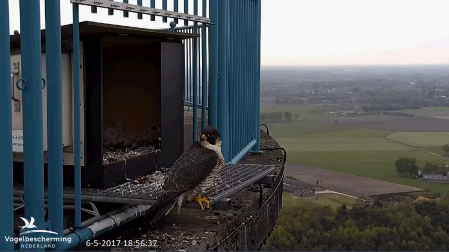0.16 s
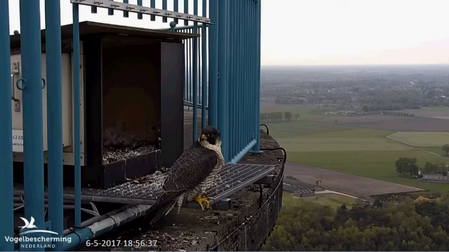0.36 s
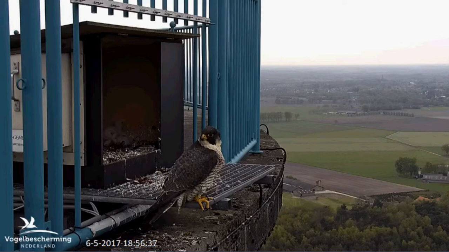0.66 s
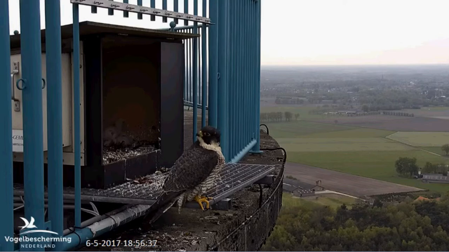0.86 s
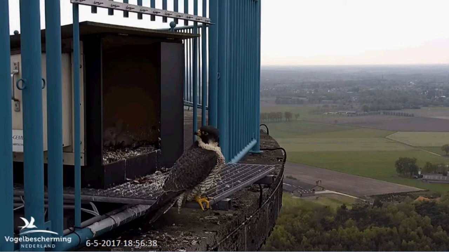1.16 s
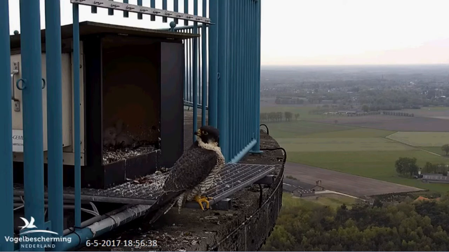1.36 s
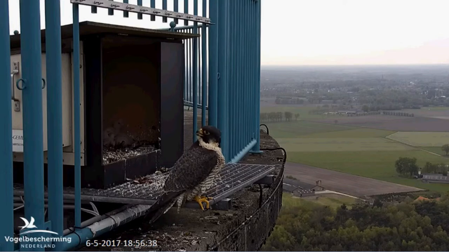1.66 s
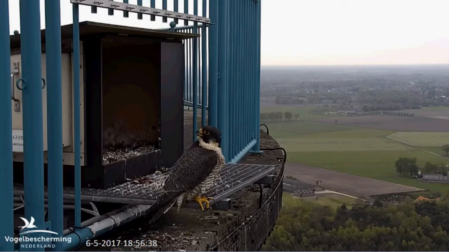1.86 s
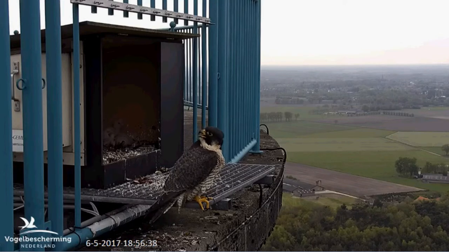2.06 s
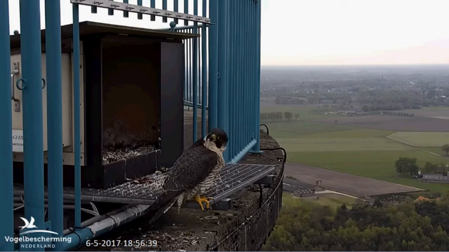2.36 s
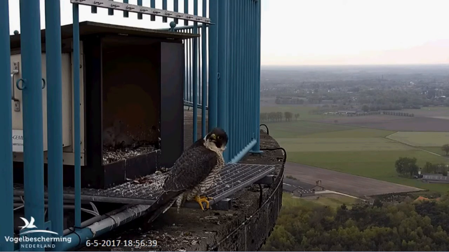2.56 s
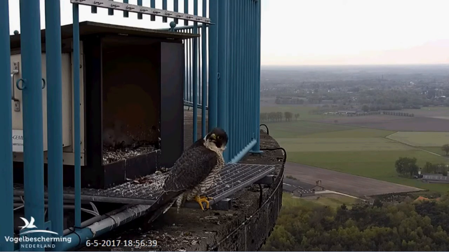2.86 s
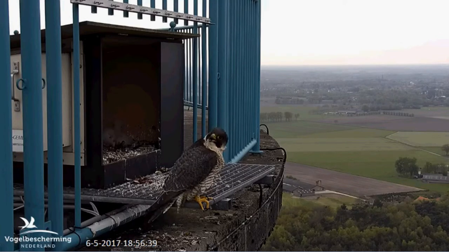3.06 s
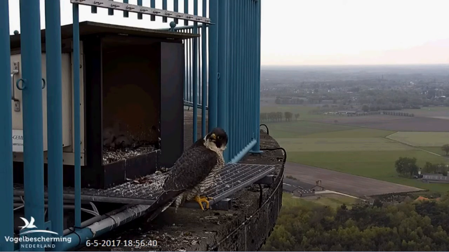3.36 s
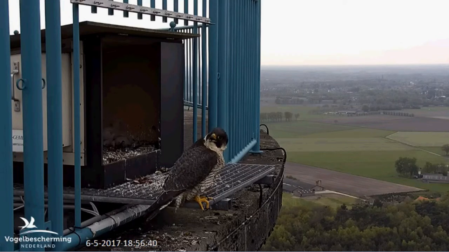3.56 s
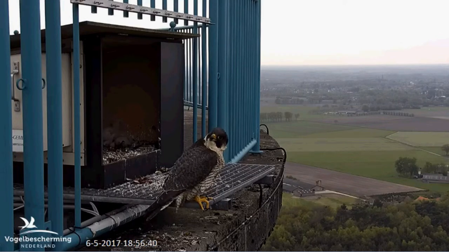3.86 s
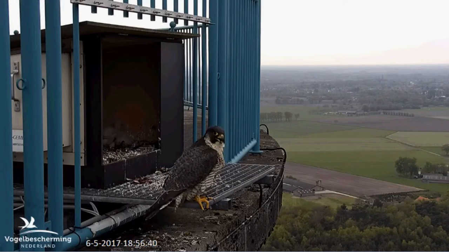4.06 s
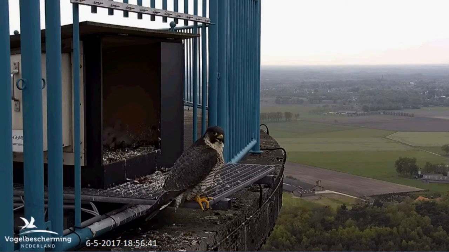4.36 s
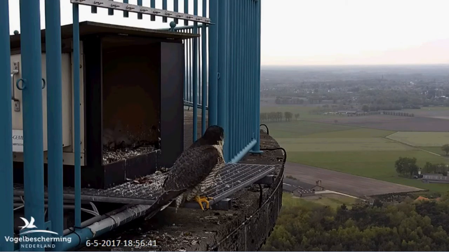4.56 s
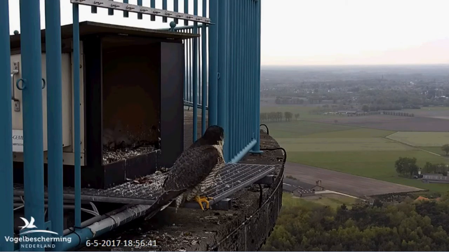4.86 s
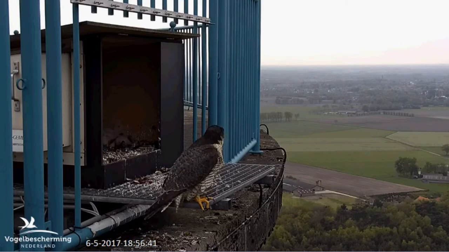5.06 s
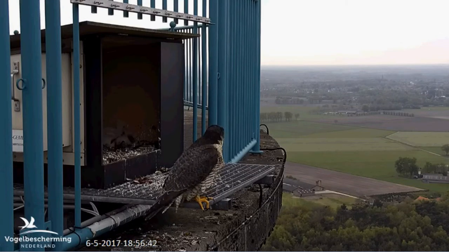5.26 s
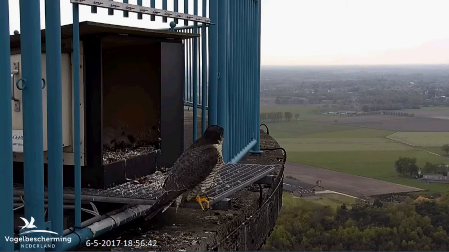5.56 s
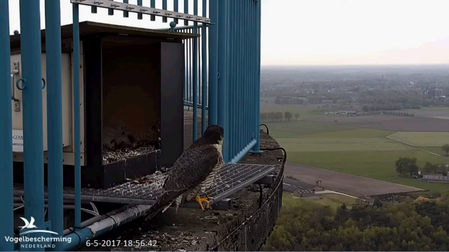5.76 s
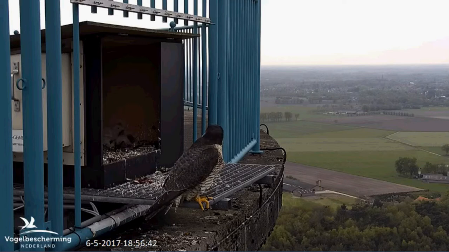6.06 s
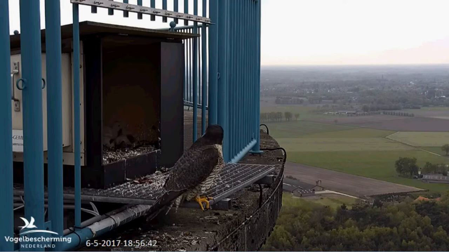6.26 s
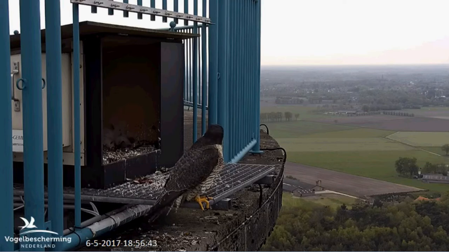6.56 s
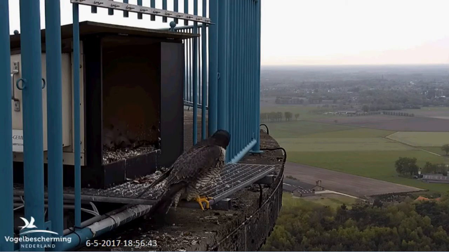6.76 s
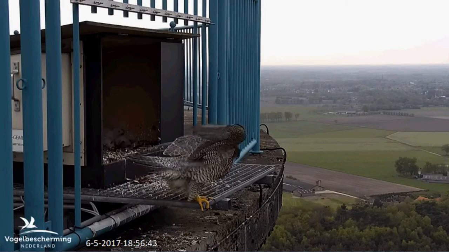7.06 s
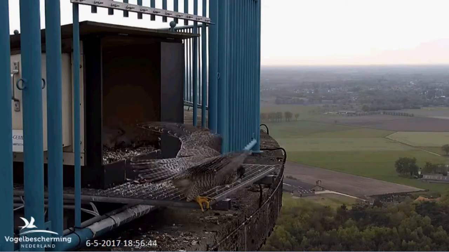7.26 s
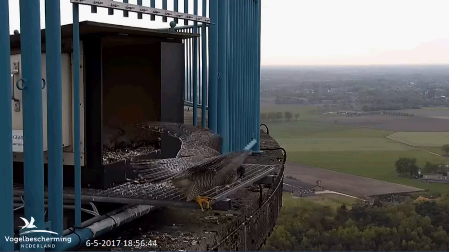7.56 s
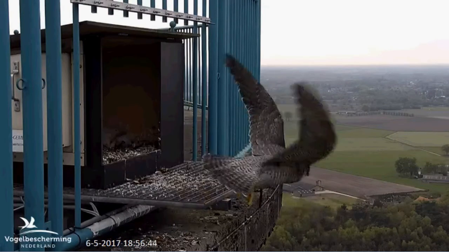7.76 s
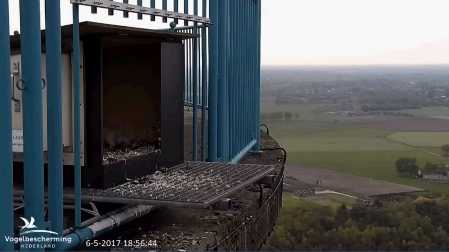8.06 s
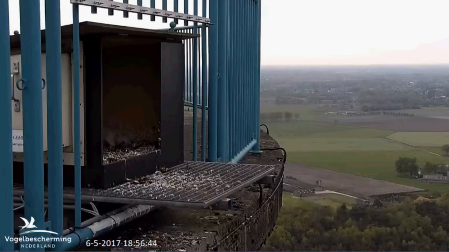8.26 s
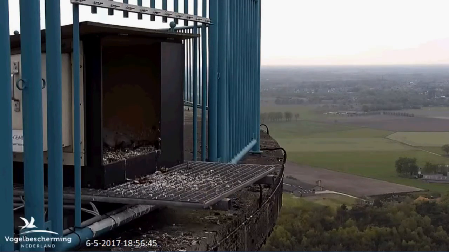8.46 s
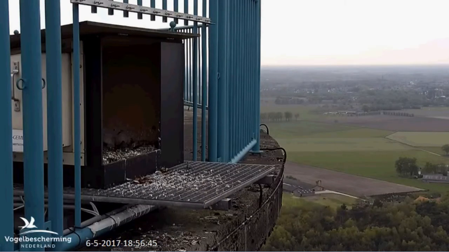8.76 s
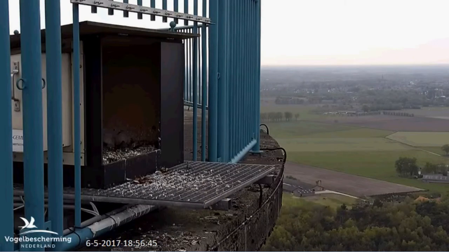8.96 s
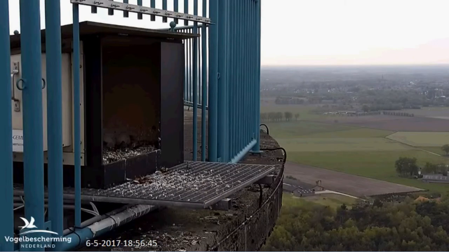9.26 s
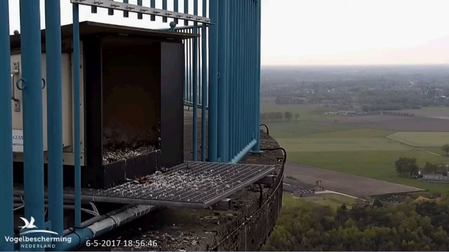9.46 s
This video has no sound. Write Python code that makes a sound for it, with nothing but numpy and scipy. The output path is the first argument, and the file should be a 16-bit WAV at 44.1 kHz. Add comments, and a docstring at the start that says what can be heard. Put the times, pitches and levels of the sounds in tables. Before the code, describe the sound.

High on a windy tower, a large falcon gives a regular run of strained, nasal, whining calls, about one a second, each gliding up in pitch. Gusts blow a soft hollow moan near the microphone, with faint mains buzz beneath. A poor connection chops the sound with crackles, skips and very short mutes. The calling stops, leaving wind and a few light scratchy ticks; no wingbeats stand out.

```python
"""Falcon wailing over a poor camera link

A falcon wails seven times on a tower ledge, close to a fixed outdoor camera: gliding harmonics plus a mouth resonance.
Wind moans in a hollow near the microphone, as noise through resonances over a broad rush. Under it lie a faint
mains hum and buzz, and a few small dry ticks of noise. The camera sends its sound in 10 ms packets over a poor
link: the waveform skips with a click at many seams, and late packets leave short mutes."""
import sys
import numpy as np
from scipy import signal
from scipy.io import wavfile
from scipy.ndimage import uniform_filter1d

SR = 44100
rng = np.random.default_rng(int(sys.argv[2]) if len(sys.argv) > 2 else 0)


def transcribe(u):
    """Save the signal u as a 16-bit wav file named by the first command-line argument.

    u: samples, shape (n,) or (channels, n), limited to [-1, 1]; the rate is SR.
    q: integer samples, one column per channel.
    """
    v = np.clip(np.atleast_2d(u).T, -1, 1)
    q = np.round(v * 32767).astype(np.int16)
    wavfile.write(sys.argv[1], SR, q)


N = 424663


def undb(db):
    """Decibels to gain."""
    return 10 ** (np.asarray(db) / 20)


def level(x, db):
    """Scale to an rms level in dB."""
    return x * undb(db) / np.sqrt(np.mean(x ** 2))


def band(x, hz, width):
    """One resonance, gain 1 at its centre."""
    return signal.lfilter(*signal.iirpeak(hz, hz / width, fs=SR), x)


def walk(rate):
    """Random levels held 1 / rate s and slewed twice; spread near 1."""
    hold = int(SR / rate)
    steps = np.repeat(rng.standard_normal(N // hold + 1), hold)
    return 1.52 * uniform_filter1d(uniform_filter1d(steps, hold), hold)[:N]


# Hum lines of the mains. Each row: multiple of the mains frequency, rms level in dB.
HUM_LINES = [(1, -80), (2, -78), (3, -69)]
MAINS_HZ = 50.0
BUZZ_HZ, BUZZ_WIDTH_HZ, BUZZ_DB = 2960, 2200, -74.5


def mains(t):
    """Low hum lines, and a thin buzz from uneven noise spikes twice a cycle, the same in every cycle."""
    hum = 0
    for multiple, db in HUM_LINES:
        hum = hum + np.sqrt(2) * undb(db) * np.sin(2 * np.pi * multiple * MAINS_HZ * t)
    cycle = int(SR / MAINS_HZ)
    angle = 2 * np.pi * np.arange(cycle) / cycle
    one_cycle = rng.standard_normal(cycle) * (1 + 1.6 * np.cos(angle) ** 8)
    spikes = np.resize(one_cycle, N)
    return hum + level(band(spikes, BUZZ_HZ, BUZZ_WIDTH_HZ), BUZZ_DB)


# Small dry ticks nearby. Each row: centre in seconds, level in dB of the noise before its filter.
TICK_TIMES = [(7.997, -56), (8.066, -42), (8.312, -46.5), (8.332, -44), (8.7107, -48), (8.729, -47.5),
              (8.765, -45)]


def ticks():
    """Five-millisecond scratches of mid-range noise."""
    out, shape = np.zeros(N), np.hanning(SR // 200)
    for s, db in TICK_TIMES:
        start = int(s * SR) - len(shape) // 2
        out[start:start + len(shape)] = undb(db) * shape * rng.standard_normal(len(shape))
    return band(out, 1100, 2140)


# Course of the gusts. Each row: time in seconds, wind level in dB.
GUSTS = [(0.0, -48.5), (0.57, -47), (0.74, -52), (1.15, -44), (1.32, -51), (1.83, -45), (2.25, -51),
         (2.73, -40.5), (2.86, -46), (3.6, -47.5), (3.7, -47.5), (5.06, -49), (5.46, -41.5), (6.09, -48),
         (6.36, -44), (7.19, -50), (7.54, -44.5), (8.66, -50), (9.62, -51.5)]
# Resonances that the wind blows. Each row: centre in Hz, width in Hz, level in dB against the wind level.
HOLLOW_RESONANCES = [(364, 31.3, -1), (536.4, 44, -13), (276.7, 61, -9.5), (817.5, 136, -19.5),
                     (1121, 230, -21.5)]
# Spectrum of the broad rush. Each row: frequency in Hz, relative density in dB, against the mean wind level.
RUSH_SPECTRUM = [(60, -37), (100, -26), (200, -20.5), (700, -23.5), (1400, -38.5), (2000, -44.5),
                 (3300, -43), (7000, -60), (13000, -57)]


def wind(t):
    """Gusty noise in the resonances of the hollow over a broad rush; low bands follow the gusts most."""
    gust_db, puff = np.interp(t, *np.transpose(GUSTS)), walk(22)
    moan = 0
    for hz, width, db in HOLLOW_RESONANCES:
        ringing = band(band(rng.standard_normal(N), hz, width), hz, 2.8 * width)
        moan = moan + level(ringing, db) * undb(1.96 * puff + 1.0 * walk(13))

    rush = 0
    points_hz, points_db = np.transpose(RUSH_SPECTRUM)
    for hz in 70 * 2 ** np.arange(0, 7.6, .5):  # half-octave bands
        gust_share = np.clip(700 / hz, .1, 1)
        # bands widen with frequency, so each carries more of the density
        db = np.interp(np.log(hz), np.log(points_hz), points_db) + 10 * np.log10(hz / 100)
        narrowed = band(band(rng.standard_normal(N), hz, hz / 2), hz, hz / 2)
        noise = level(band(narrowed, hz, hz), db)
        swell_db = gust_share * (gust_db - gust_db.mean() + 1.6 * puff) + 0.72 * walk(10)
        rush = rush + noise * undb(swell_db)
    return moan * undb(gust_db) + rush * undb(gust_db.mean())


# One curve a wail, between its opening and its close. Each row: time in seconds, pitch in Hz,
# throat level in dB (rms), level in dB (rms) of a harmonic at the centre of the mouth resonance.
WAIL_CURVES = [
    [(0.44, 856, -51.5, -62), (0.58, 822, -51, -62), (0.85, 876.4, -44, -63), (1.04, 953, -53.5, -69),
     (1.065, 1045, -62, -54.5), (1.08, 1051, -73, -48.5), (1.205, 1087, -73, -48), (1.23, 1091, -83.5, -57),
     (1.3, 1086, -72, -53), (1.46, 1087, -60, -49.5), (1.55, 1111, -54, -48), (1.585, 1172, -74, -52),
     (1.628, 1178, -78, -59), (1.645, 1124, -77, -40.5), (1.663, 1078, -81, -47), (1.675, 1096, -44.5, -39)],
    [(1.83, 1013, -43, -51), (2.1, 1099, -44.5, -54.5), (2.22, 1121, -42.5, -46.5), (2.34, 1116, -44, -48),
     (2.38, 1185, -38, -46), (2.4, 1150, -41.5, -40)],
    [(2.57, 1034, -44.5, -48), (2.76, 1085, -44.5, -53), (3.02, 1123, -44, -47), (3.1, 1140, -42, -38),
     (3.255, 1172, -41.5, -40.5)],
    [(3.46, 1065, -44.5, -47.5), (3.53, 1075, -46, -62), (3.61, 1113, -44.5, -49), (3.75, 1139, -44, -61),
     (3.88, 1163, -44, -51.5), (3.98, 1158, -43.5, -58.5), (4.07, 1219, -45.5, -47.5)],
    [(4.29, 1084, -49, -54.5), (4.35, 1068, -48, -50.5), (4.5, 1094, -45.5, -52.5), (4.62, 1104, -43, -63),
     (4.72, 1140, -41, -54), (4.955, 1162, -40, -48.5)],
    [(5.235, 1025, -47.5, -52), (5.3, 989, -53.5, -49), (5.38, 1030, -47, -47.5),
     (5.55, 1069, -47.5, -48.5), (5.82, 1102, -42, -39), (5.92, 1124, -42.5, -44), (6.03, 1173, -40.5, -44)],
    [(6.29, 1065, -51, -56.5), (6.35, 1040, -56, -52), (6.53, 1080, -49, -51), (6.575, 1127, -44, -59.5),
     (6.68, 1093, -47.5, -57), (6.78, 1147, -44.5, -52.5), (6.87, 1133, -44.5, -55.5),
     (7.005, 1110, -48, -39)],
]
# Pressing of the throat's overtones in each wail. Each row: dB at its start, dB at its last curve point.
OVERTONE_STRAIN = [(-5.5, 2), (-3, 3.5), (0.5, 2), (-5, -3), (-8, -10.5), (4, -5), (-11.5, 6.5)]
# The throat's harmonics 1 to 5. Each entry: level in dB against the throat level.
THROAT_HARMONICS_DB = [-0.5, -17.5, -19.5, -26.5, -37.5]
# The mouth resonance wanders high in the first, broken wail, then rests on the second harmonic.
# Each row: time in seconds, centre in Hz, half-width in Hz at which the gain halves.
MOUTH_RESONANCE = [(0.85, 3050, 800), (1.04, 3320, 1110), (1.08, 3200, 300), (1.2, 3140, 300),
                   (1.23, 4300, 402), (1.3, 4200, 450), (1.33, 3503, 816), (1.55, 3420, 810),
                   (1.62, 3900, 900), (1.645, 3420, 350), (1.665, 3350, 350), (1.674, 2180, 430)]
# Every wail scoops up into its first pitch and drops from its last: pitch ratio, throat dB, mouth dB.
OPENING, CLOSE = (0.94, -8.5, -3), (0.86, -16, -8.5)
OPENING_S, CLOSE_S = 0.022, 0.02
FLARE_DB = 15  # the overtones are pressed harder still as the throat closes
WAVER_HZ, FLUTTER_DB, BREATH_DB = 2.5, 1.39, -26.5
LEDGE_T60_S, LEDGE_DB = 0.063, -9.5


def wail_edge(row, shift_s, rule):
    """The outer end of a wail: its nearest curve point moved in time, pitch and level."""
    s, hz, throat_db, mouth_db = row
    ratio, throat_step_db, mouth_step_db = rule
    return s + shift_s, hz * ratio, throat_db + throat_step_db, mouth_db + mouth_step_db


def ledge(x):
    """Railings and the nest box throw back a short tail, as noise that decays exponentially."""
    tail_s = np.arange(SR // 4) / SR
    tail = rng.standard_normal(SR // 4) * undb(-60 * tail_s / LEDGE_T60_S)
    return x + undb(LEDGE_DB) * signal.fftconvolve(x, tail / np.linalg.norm(tail))[:N]


def falcon(t):
    """Harmonics on a gliding pitch, with a little breath around them; the mouth resonance lifts those inside it."""
    out = np.zeros(N)
    waver = WAVER_HZ * walk(60)
    breath = level(band(rng.standard_normal(N), 130, 133), BREATH_DB)
    flutter = [FLUTTER_DB * walk(40) for _ in THROAT_HARMONICS_DB]
    mouth_s, mouth_hz, mouth_width = np.transpose(MOUTH_RESONANCE)
    for wail, (start_db, end_db) in zip(WAIL_CURVES, OVERTONE_STRAIN):
        opening = wail_edge(wail[0], -OPENING_S, OPENING)
        close = wail_edge(wail[-1], CLOSE_S, CLOSE)
        s, hz, throat_db, mouth_db = np.transpose([opening, *wail, close])
        on = (t > s[0] - .008) & (t < s[-1] + .008)
        now = t[on]
        fade = np.clip(np.minimum(now - s[0], s[-1] - now) / 0.0028 + 1, 0, 1) ** 2
        press_db = np.interp(now, s[[0, -2, -1]], [start_db, end_db, end_db + FLARE_DB])
        pitch = np.interp(now, s, hz)
        phase = 2 * np.pi * np.cumsum(pitch + waver[on]) / SR
        centre = np.interp(now, mouth_s, mouth_hz)
        width = np.interp(now, mouth_s, mouth_width)
        for k, db in enumerate(THROAT_HARMONICS_DB):
            harmonic = k + 1
            throat = undb(np.interp(now, s, throat_db) + db + (k > 0) * press_db)
            off = (harmonic * pitch - centre) / width
            mouth = undb(np.interp(now, s, mouth_db)) / (1 + off ** 4)
            size = np.sqrt(2) * (throat + mouth) * undb(flutter[k][on]) * fade
            out[on] += size * (1 + harmonic * breath[on]) * np.sin(harmonic * phase)
    return ledge(out)


def scene():
    """Hum, ticks, wind and bird at one microphone."""
    t = np.arange(N) / SR
    return (mains(t) + ticks() + wind(t) + falcon(t))[None]


PACKET_S, FIRST_SEAM_S = .01, .0091


def seam_s(packet):
    """The moment at which a packet ends."""
    return FIRST_SEAM_S + PACKET_S * packet


# Spells of a poor link; the first and last seams always skip.
# Each row: first packet, last packet, share (0 to 1) of the seams between that skip.
POOR_SPELLS = [(8, 8, 1), (25, 36, .4), (47, 72, .4), (83, 91, .4), (127, 147, .4), (155, 160, .2),
               (175, 175, 1), (264, 267, 1), (272, 276, .7), (283, 286, .5), (298, 298, 1), (304, 304, 1),
               (307, 316, 1), (322, 327, .8), (342, 343, 1), (375, 377, 0), (407, 407, 1), (421, 421, 1),
               (431, 448, .4), (456, 468, .5), (472, 478, 1), (485, 486, 1), (537, 571, .6), (584, 591, 1),
               (618, 620, 1), (624, 624, 1), (656, 656, 1), (685, 685, 1), (736, 774, .42), (799, 799, 1),
               (810, 810, 1), (930, 930, 1)]


def bad_seams():
    """The seams that skip: both ends of each spell and a random share of those between."""
    share = np.zeros(int(N / SR / PACKET_S))
    for first, last, part in POOR_SPELLS:
        share[first:last + 1] = part
        share[[first, last]] = 1
    return rng.random(len(share)) < share


SKIP_S, SCRAP_S = .004, .005  # furthest reach of the reading place either way, mean length of a scrap


def skip(x):
    """At each bad seam the reading place jumps to a spot where the two ends do not meet, so that it clicks;
    two scraps of a few milliseconds follow, the last of which is picked to meet better and click more softly."""
    seams = np.flatnonzero(bad_seams())
    chance = rng.random((len(seams), 3, 5))
    # the first jump is on the seam, the next two after random waits
    waits = np.cumsum(-SCRAP_S * np.log(1 - chance[:, :, 0]) * [0, 1, 1], axis=1)
    jumps = ((seam_s(seams)[:, None] + waits) * SR).astype(int)
    tries = (SKIP_S * SR * (2 * chance[:, :, 1:] - 1)).astype(int)
    shift = np.zeros(N, int)
    for places, spots in zip(jumps, tries):
        for i, options, rank in zip(places, spots, (2, 2, 1)):  # rank 0 would be the smoothest of four
            mismatch = abs(x[i + options] - x[i + shift[i]])
            shift[i:] = options[np.argsort(mismatch)[rank]]
    return x[np.clip(np.arange(N) + shift, 0, N - 1)]


# Late packets. Each row: packet after which the sound resumes, length of the mute before that in ms.
LATE_PACKETS = [(26, 5.5), (33, 23), (39, 7), (59, 5), (61, 5.5), (67, 16.5), (78, 44), (92, 8), (144, 6),
                (273, 7), (279, 26), (291, 6.5), (303, 6.5), (309, 6.5), (320, 6.5), (439, 6.5), (444, 6),
                (456, 6.5), (460, 6.5), (461, 7.5), (481, 16.5), (491, 6), (546, 5), (550, 4), (552, 5),
                (554, 4.5), (556, 4.5), (559, 17), (595, 6.5), (626, 7), (631, 4.5), (719, 14), (745, 4.5),
                (764, 5.5), (768, 7), (777, 23), (814, 16.5), (943, 7)]
RESUME_S, EDGE_S = .0004, .00013  # resume delay after the seam, softened edge of a mute
TRAIL_HZ, TRAIL_S, TRAIL_DB = 670, 0.0056, -2.5
HISS_DB, TOP_HZ = -78, 12900


def record(dry):
    """The link skips at seams and mutes late packets, in which only a dull trail dies away over a faint hiss;
    the top is cut."""
    stream, gate, trail = skip(dry[0]), np.ones(N), np.zeros(N)
    for packet, mute_ms in LATE_PACKETS:
        resume = int((seam_s(packet) + RESUME_S) * SR)
        stop = resume - int(mute_ms * SR / 1000)
        gate[stop:resume] = 0
        trail[stop:resume] = np.exp(-np.arange(resume - stop) / SR / TRAIL_S)
    gate = uniform_filter1d(gate, int(EDGE_S * SR))
    dull = signal.sosfilt(signal.butter(2, TRAIL_HZ, fs=SR, output="sos"), stream)
    remnant = dull * (1 - gate) * trail * undb(TRAIL_DB)
    hiss = undb(HISS_DB) * rng.standard_normal(N)
    top_cut = signal.ellip(10, .2, 70, TOP_HZ, fs=SR, output="sos")
    return signal.sosfilt(top_cut, stream * gate + remnant + hiss)[None]


dry = scene()
out = record(dry)
transcribe(out)
```